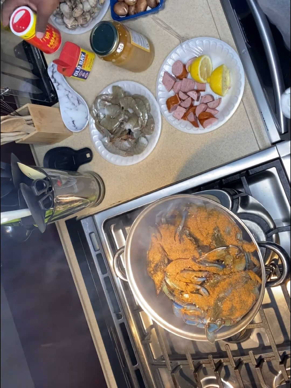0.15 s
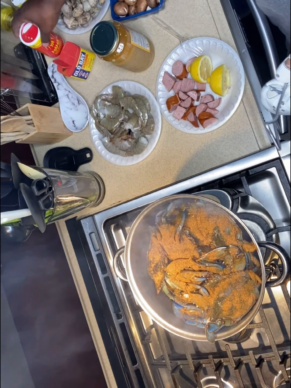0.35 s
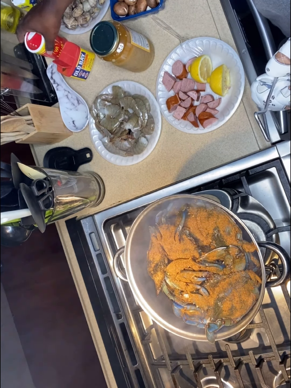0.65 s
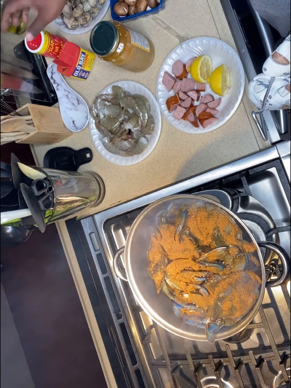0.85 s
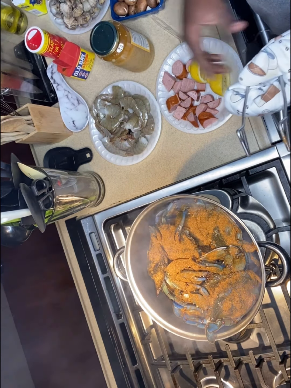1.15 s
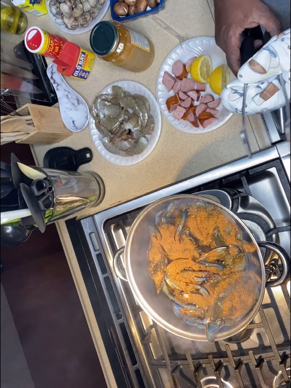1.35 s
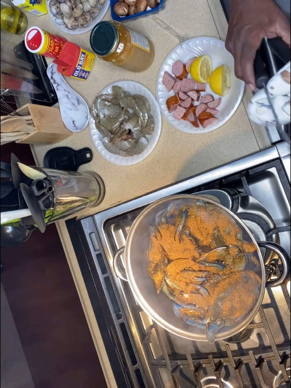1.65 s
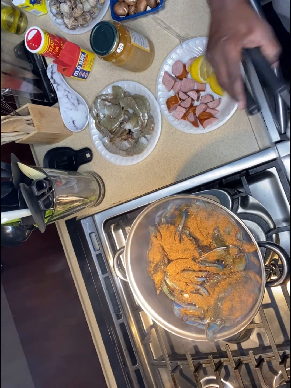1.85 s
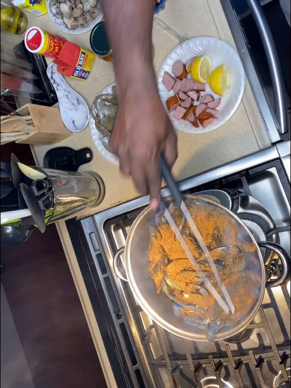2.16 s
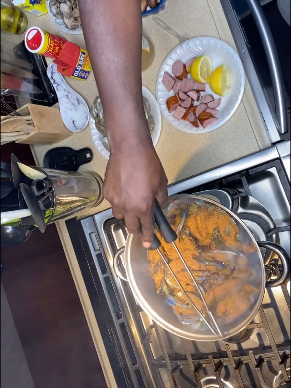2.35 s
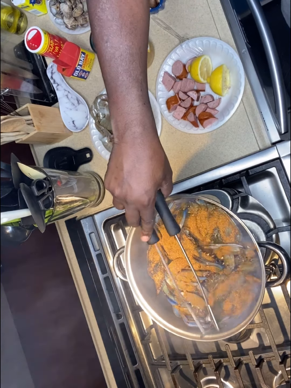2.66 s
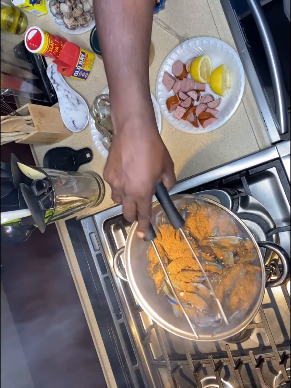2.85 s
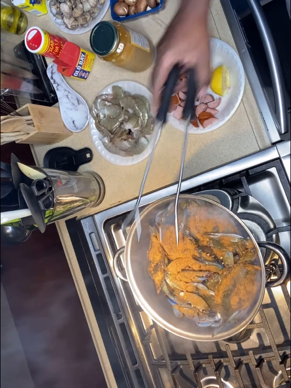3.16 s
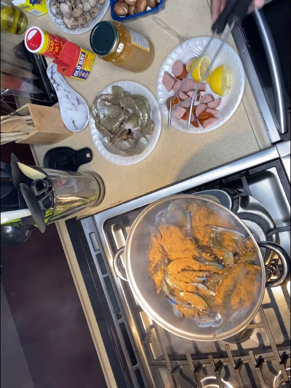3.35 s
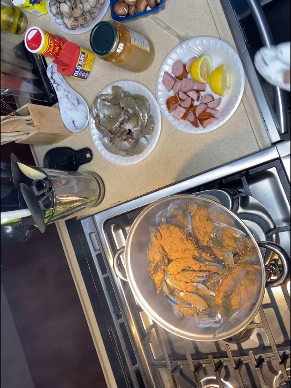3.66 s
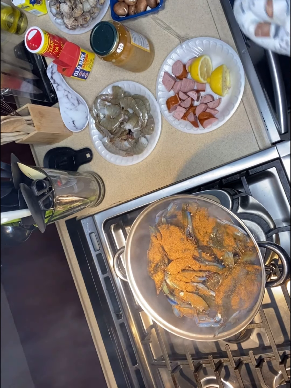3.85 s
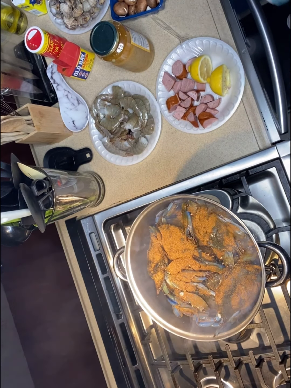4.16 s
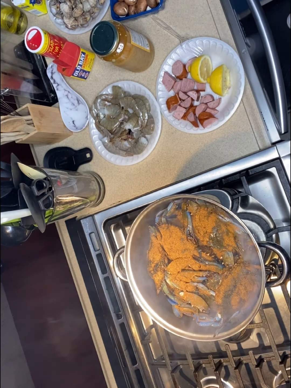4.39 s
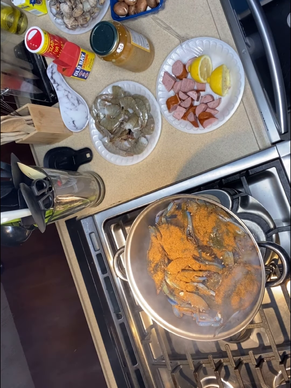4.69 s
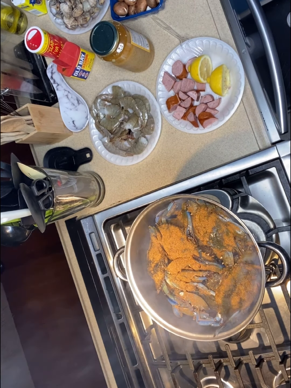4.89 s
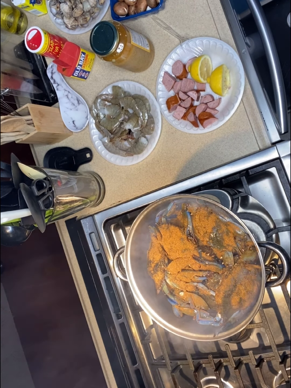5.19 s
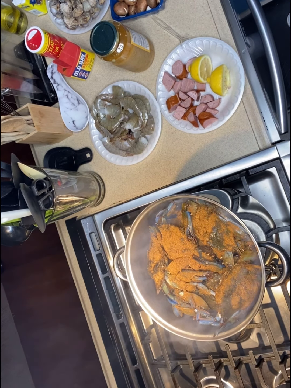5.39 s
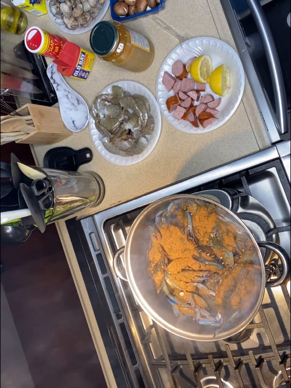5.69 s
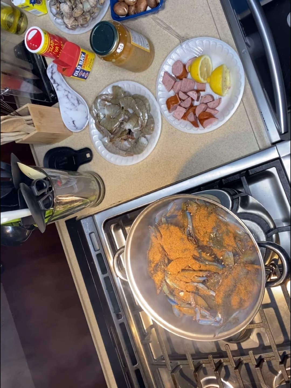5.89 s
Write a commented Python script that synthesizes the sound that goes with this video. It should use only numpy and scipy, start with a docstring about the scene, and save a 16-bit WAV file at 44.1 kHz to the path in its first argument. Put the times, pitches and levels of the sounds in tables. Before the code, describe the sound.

Close stereo pickup above a stove: faint steady roar, gas hiss and tiny bubbles. First rubbing and a tin's sharp rattling landing, then mitt and tool handling, a hard tong knock on the pot with a brief scrape and shell taps. Later, slightly farther away, dull wooden knocks, a ringing lid and something heavy sliding, ending in firm knocks.

```python
"""In a kitchen a pot of shellfish simmers on a gas stove: coloured noise for flame and hiss, tiny rings for bubbles.
A spice tin is put down on the counter, an oven mitt and tongs are handled, the tongs click and knock shells and pot.
Then a steel lid and dull knocks sound off to one side, and something heavy slides along a shelf.
Every blow is a crack and clatter plus the decaying modes of the struck thing; rubs are noise shaped by strokes.
The room adds a diffuse, decaying echo to the blows."""
import sys
import numpy as np
from scipy import signal
from scipy.fft import rfft, irfft, next_fast_len
from scipy.io import wavfile
from scipy.ndimage import uniform_filter1d

SR = 44100
rng = np.random.default_rng(int(sys.argv[2]) if len(sys.argv) > 2 else 0)


def wav_out(sig):
    """Save sig, one row per channel (or a flat mono array), as 16-bit PCM at SR to the path in sys.argv[1]."""
    wavfile.write(sys.argv[1], SR, np.round(np.clip(np.atleast_2d(sig).T, -1, 1) * 32767).astype(np.int16))


N = 265923

# Modes of a hollow board. Each row: frequency in Hz, level in dB, t60 when free in seconds.
BOARD_MODES = [(544, -4, .06), (632, -7, .05), (800, -5, .05), (942, -6, .05), (1138, -3, .05),
               (1330, -5, .05), (1650, -3, .04), (1835, -5, .04), (1940, -4, .04), (2080, -4, .04),
               (2155, -2, .05), (2430, -3, .04), (2820, -5, .04), (3200, -6, .03), (3450, -7, .03),
               (3709, -8, .03), (4000, -8, .03), (4260, -9, .03)]
# Spectrum of bright friction. Each row: frequency in Hz, density in dB per Hz.
RUSTLE_SPECTRUM = [(1500, -26), (2700, -5), (4200, -6), (6500, -11.5), (9000, -16), (11500, -20),
                   (13500, -52)]
# Coherence of diffuse sound at the two ports. Each row: frequency in Hz, left-right likeness from -1 to 1.
ROOM_LIKENESS = [(60, 0.99), (120, 0.98), (240, 0.89), (480, 0.3), (950, 0.35), (1890, 0.3), (3770, 0.3),
                 (7520, 0.6), (15000, -0.69)]


def from_db(db):
    """Decibels to amplitude: 20 dB is a factor of ten."""
    return 10 ** (np.asarray(db) / 20)


def rms_one(x):
    """Normalise the mean power to one."""
    return x / np.sqrt(np.mean(x ** 2) + 1e-20)


def at_hz(points, hz):
    """Interpolate a table along logarithmic frequency, the axis of musical intervals."""
    table_hz, values = np.transpose(points)
    return np.interp(np.log(np.maximum(hz, 1)), np.log(table_hz), values)


def drift(rate_hz):
    """Slow random wandering of rms 1: white noise through two equal low-pass poles."""
    step = 40   # samples between computed points
    r = np.exp(-2 * np.pi * rate_hz * step / SR)
    noise = rng.standard_normal(N // step + 2002)
    slow = signal.lfilter([1], [1, -2 * r, r * r], noise)[2000:]   # past the filter's start
    return np.interp(np.arange(N) / step, np.arange(len(slow)), rms_one(slow))


def stereo(mid, side, spectrum, likeness):
    """Partial coherence: the balance of unrelated mid and side sets the left-right likeness; rms 1."""
    size = next_fast_len(len(mid), real=True)
    hz = np.fft.rfftfreq(size, 1 / SR)
    alike = np.clip(at_hz(likeness, hz), -1, 1)
    common = np.sqrt(1 + alike) * rfft(mid, size)
    opposed = np.sqrt(1 - alike) * rfft(side, size)
    both = common + opposed * [[1], [-1]]
    coloured = both * from_db(at_hz(spectrum, hz))
    return rms_one(irfft(coloured, size)[:, :len(mid)])


def stove():
    """Turbulence: flame and simmering broth roar as broadband noise, under a hiss of gas and steam."""
    # Flame roar and simmer. Each row: frequency in Hz, density in dB per Hz.
    roar_spectrum = [(30, -17), (58, 5.5), (80, -10), (110, 0), (200, -12.5), (300, -2.5), (400, -14.5),
                     (860, -10.5), (1060, -13), (1600, -7), (2300, -12), (2800, -16.5), (3400, -13),
                     (3850, -17), (4300, -14.5), (5300, -26), (7000, -45)]
    # The roar dips late on. Each row: time in seconds, level change in dB.
    roar_level = [(0, 0), (2.5, 1), (3.9, .5), (4.9, -1), (5.12, -3.5), (5.35, -2), (6.0, -1)]
    # Gas and steam. Each row: frequency in Hz, density in dB per Hz.
    hiss_spectrum = [(3000, -30), (4300, -8), (5450, -7), (5850, 0.5), (6300, -0.7), (6550, -6), (6750, -3),
                     (7300, -11), (9000, -14), (9500, -12), (11800, -16), (13000, -40)]
    # The hiss is weaker late on. Each row: time in seconds, level in dB.
    hiss_level = [(2.3, -61.5), (3.3, -61), (3.9, -62), (4.4, -63), (5.1, -69), (6.0, -67)]
    # Each row: frequency in Hz, left-right likeness from -1 to 1.
    likeness = [(60, 0.97), (120, 0.92), (240, 0.85), (480, 0.4), (950, 0.63), (1890, 0.62), (3770, 0.55),
                (7520, 0.83), (15000, -0.64)]
    t = np.arange(N) / SR
    hiss_db = np.interp(t, *np.transpose(hiss_level)) + .6 * drift(4)   # wavers slightly
    hiss = from_db(hiss_db) * stereo(*rng.standard_normal((2, N)), hiss_spectrum, likeness)
    roar_db = -58.2 + np.interp(t, *np.transpose(roar_level))
    roar = from_db(roar_db) * stereo(*rng.standard_normal((2, N)), roar_spectrum, likeness)
    return roar + hiss


def simmer():
    """Bubble resonance: bursts at random and in clumps each ring briefly, the higher pitches the stronger."""
    typical_per_s, cycles_to_60_db, level_db = 200, 30, -67.5
    chance = typical_per_s * from_db(4 * drift(5)) / SR
    bursts = (rng.random((2, N)) < chance) * rng.standard_normal((2, N))
    shared = bursts + .7 * bursts[::-1]   # each side also hears the other's bubbles
    pitch_index, out = rng.integers(0, 14, N), 0
    for k, hz in enumerate(np.geomspace(1300, 1900, num=14)):
        r, w = from_db(-60 * hz / cycles_to_60_db / SR), 2 * np.pi * hz / SR
        own = shared * (pitch_index == k) + 1e-18   # the offset keeps the filter from underflow
        out = out + hz * signal.lfilter([0, np.sin(w)], [1, -2 * r * np.cos(w), r * r], own)
    return from_db(level_db) * rms_one(out)


def strokes(rows, hold_s, fade_db_per_s):
    """Incoherent addition: strokes (peak s, swell s, dB) swell, hold and fade, and their powers add."""
    swell_db = 20   # a swell climbs this far to its peak
    t, power = np.arange(0, N + 64, 64) / SR, 0
    for s, swell_s, level_db in rows:
        before_db = swell_db * (s - t) / swell_s
        after_db = fade_db_per_s * np.maximum(t - s - hold_s, 0)
        under_db = np.where(t < s, before_db, after_db)
        power = power + from_db(level_db - under_db) ** 2
    return np.interp(np.arange(N) / SR, t, np.sqrt(power))


def handling(grain_db):
    """Friction: cloth and tools slide in uneven grains of three colours under the same strokes."""
    # Hands, mitt and tools rubbing past things. Each row: peak time in seconds, swell in seconds,
    # level in dB, brightness in dB, weight in dB.
    rubs = [(.15, 0.42, -49.5, 0, -9), (.36, 0.3, -45.5, 1, -6), (.58, 0.22, -46.5, -1, -9),
            (0.748, 0.25, -47.5, 0.5, -11), (0.929, 0.087, -45.5, -1, -14), (1.099, 0.084, -41.5, -0.5, -9),
            (1.399, 0.053, -49.5, 4, -11), (1.559, 0.081, -48.5, -4.5, -7), (1.66, 0.1, -52.5, 1.5, -11),
            (1.77, 0.12, -49, -1, -13), (1.999, 0.11, -45.5, -1, -9), (2.42, .05, -52, -4, -12),
            (3.1, .1, -62, 3, -6), (3.55, 0.12, -61, -6, -2), (3.885, 0.025, -51.5, -5, -9),
            (4.155, 0.026, -62.5, 4.5, -4), (4.66, 0.084, -52, -6, -5), (5.02, 0.068, -52, -8, 2),
            (5.19, 0.088, -61, -7, 6.5), (5.38, .1, -62, -15, 7), (5.55, .1, -64, -8, 6),
            (5.88, 0.089, -51, -15, -9)]
    # Low friction. Each row: frequency in Hz, density in dB per Hz.
    rumble_spectrum = [(25, -18), (55, 10.5), (125, 10.5), (200, -0.5), (320, -0.5), (500, -86)]
    # Middle friction. Each row: frequency in Hz, density in dB per Hz.
    shuffle_spectrum = [(150, -16), (330, -2), (700, -4), (1600, -3), (2400, -5), (4000, -38)]
    pan_db = 1.2   # left over right
    s, swell_s, level_db, bright_db, weight_db = np.transpose(rubs)
    colours = [(rumble_spectrum, weight_db, 3), (shuffle_spectrum, 0, .7), (RUSTLE_SPECTRUM, bright_db, .7)]
    out = 0
    for spectrum, offset_db, lumps_db in colours:
        unevenness_db = grain_db * drift(200) + lumps_db * drift(12)
        grains = rng.standard_normal((2, N)) * from_db(unevenness_db)
        gain = strokes(zip(s, swell_s, level_db + offset_db), hold_s=.025, fade_db_per_s=70.5)
        out = out + gain * stereo(*grains, spectrum, ROOM_LIKENESS)
    return out * from_db([[pan_db / 2], [-pan_db / 2]])


def thumps(rise_s):
    """Damped oscillation: a heavy touch makes the furniture boom once, alike in both ports."""
    # Thumps through counter and floor. Each row: start in seconds, level in dB, frequency in Hz, t60 in seconds.
    thump_rows = [(0.339, -31, 61.7, 0.13), (0.419, -32, 128, 0.45), (1.08, -38.5, 111, 0.14),
                  (1.986, -30.5, 112, 0.087), (3.931, -35, 45.4, 0.29), (4.388, -37.5, 126, 0.21),
                  (4.81, -30.5, 109.6, 0.17), (5, -35, 175.5, 0.26), (5.718, -39, 107.5, 0.16)]
    out, t = np.zeros(N + SR), np.arange(SR // 2) / SR
    for s, level_db, hz, t60 in thump_rows:
        i = round(s * SR)
        envelope = from_db(level_db - 60 * t / t60) * (1 - np.exp(-t / rise_s))
        out[i:i + len(t)] += envelope * np.sin(2 * np.pi * hz * t)
    return out[:N]


def blows(table, modes, colour_db, clatter_db, pan_db, freedom, favour_db, rise_s):
    """Modal impact: struck modes ring over a dying clatter of small contacts, six bands set to their peaks."""
    # Edges of the six bands, in Hz.
    edges_hz = [160, 600, 1400, 2800, 4800, 7500, 15000]
    # Share of the pan in each band: bass and top arrive nearly alike in both ports.
    pan_share = [.3, .6, 1.3, .8, .6, .1]
    pivot_hz = 2000   # weight tilts a blow's colour below this, hardness above
    lows_late = .6   # doublings of the rise time per octave down
    favour_width, favour_rings = .015, .1   # relative width of a favoured spot; its extra share of ring
    pair_split, pair_db = .018, -1   # each mode beats with a close twin: relative spread, level
    crack_s, crack_db = .0008, 1   # the first contact snaps above the clatter
    grit_db, spread_db = 2.5, 1.5   # uneven clatter; no two blows strike a mode equally

    out, t = np.zeros((2, N + SR)), np.arange(11000) / SR
    bank = [signal.butter(2, pair, "band", fs=SR, output="sos") for pair in zip(edges_hz, edges_hz[1:])]
    octaves = np.log2(np.sqrt(np.multiply(edges_hz[:-1], edges_hz[1:])) / pivot_hz)
    hz, level_db, t60 = np.transpose(modes)[:, :, None]
    for s, peak_db, weight, hardness, clatter_s, *favoured_hz in table:
        tilt_db = np.where(octaves < 0, -weight, hardness) * octaves
        peaks_db = peak_db + np.array(colour_db) + tilt_db

        favour = sum(np.exp(-(np.log(hz / f) / favour_width) ** 2) for f in favoured_hz)
        uneven_db = spread_db * rng.standard_normal((len(modes), 1))
        strength = from_db(level_db + favour_db * favour + uneven_db)
        phase = 2 * np.pi * rng.random((len(modes), 1))
        twin_hz = hz * (1 + pair_split * rng.standard_normal((len(modes), 1)))
        twin = from_db(pair_db) * np.sin(2 * np.pi * twin_hz * t + phase)
        pair = np.sin(2 * np.pi * hz * t + phase) + twin
        decay = from_db(-60 * t / (t60 * freedom * (1 + favour_rings * favour)))
        rings = np.sum(strength * pair * decay, axis=0)

        grit = from_db(grit_db * np.repeat(rng.standard_normal(len(t) // 50), 50))
        dying = np.exp(-t / clatter_s) + from_db(crack_db) * np.exp(-t / crack_s)
        clatter = rng.standard_normal(len(t)) * grit * dying

        struck = rings + from_db(clatter_db) * clatter
        parts = []
        for sos, octave in zip(bank, octaves):
            band_rise_s = rise_s * 2 ** (-lows_late * octave)
            parts.append(signal.sosfilt(sos, struck) * (1 - np.exp(-t / band_rise_s)))
        peaks = [np.sqrt(uniform_filter1d(2 * p[:1024] ** 2, size=200).max()) for p in parts]
        gains = from_db(peaks_db + np.outer([pan_db / 2, -pan_db / 2], pan_share)) / peaks
        signs = (-1) ** np.arange(len(bank))   # alternate signs join the bands without notches
        i = round(s * SR)
        out[:, i:i + len(t)] += (gains * signs) @ parts
    return out[:, :N]


def tin():
    """Plate modes: a spice tin lands on the counter in a quick run of contacts."""
    # Each row: start in seconds, peak at the pivot in dB, weight and hardness in dB per octave,
    # clatter in seconds, then any modes that the spot favours in Hz.
    rows = [(.393, -25, 0, -6, 0.008, 2040), (.398, -30, 0, -4, .005, 2040, 3750),
            (.404, -17, -1.5, 1.5, .004, 3250), (.42, -25.5, 3.5, -3, 0.0093, 2040),
            (.429, -28, 2, 1, 0.0069), (.435, -32, -2, 1, .003, 3750), (.441, -26.5, 0, 1, 0.005, 3400),
            (.451, -28.5, 2, -4, 0.011, 2040), (.458, -35, 0, 0, .004, 3750),
            (.466, -38, 0, -1, .005, 3250), (.478, -37, 0, -1, .005, 4880)]
    # Each row: frequency in Hz, level in dB, t60 when free in seconds.
    modes = [(260, -6, .1), (370, -2, .1), (454, -5, .08), (700, -12, .05), (1023, -9, .08),
             (1300, -11, .05), (1890, -7, .08), (1970, -8, .08), (2040, -1.5, .09), (2370, -9, .05),
             (2820, -11, .06), (3075, -8, .05), (3250, -6, .07), (3400, -10, .1), (3750, -7, .07),
             (4880, -10, .1), (6100, -12, .05), (9200, -10, .03), (9900, -14, .03)]
    # Colour of a plain blow in the six bands, in dB against the pivot.
    colour_db = [-5.5, -4, -0.5, 0, -5.5, -4.5]
    return blows(rows, modes, colour_db, clatter_db=5, pan_db=3.5, freedom=.55, favour_db=2, rise_s=.0006)


def tongs_and_pot():
    """Damped modes: the tongs' spring clicks once, then the tongs knock the pot wall, which rings briefly."""
    # The first row is the spring's click. Each row: start in seconds, peak at the pivot in dB,
    # weight and hardness in dB per octave, clatter in seconds, then any favoured modes in Hz.
    rows = [(2.029, -43.5, -4, 11, 0.0053, 7090), (2.249, -17, -1, -0.5, 0.004, 1787),
            (2.254, -21, 2, 1, .003, 1787, 830), (2.262, -25, 0, -4, .004, 1702),
            (2.266, -36, -2, 4, .003, 2527), (2.275, -25, 1, -4, 0.004, 2527, 714),
            (2.289, -31, 0, -2, .005, 2374), (2.304, -37, 3, -1, .006, 830),
            (2.297, -36, -2, 2, .004, 2374), (2.312, -41, -2, 4, .004, 3800),
            (2.357, -45, -1, 4, .004, 3800), (2.322, -36, -2, -4, .005, 2527),
            (2.369, -39, 3, -1, .003, 1270), (2.378, -42, 5, 1.5, .004, 960),
            (2.386, -48, -2, 5, .004, 3800), (2.402, -46, 1, 3, .004, 960, 3800),
            (2.415, -46, 4, -3, .006, 960)]
    # Each row: frequency in Hz, level in dB, t60 when free in seconds.
    modes = [(288, -9, .12), (714, -7, .08), (830, -10, .05), (960, -9, .08), (1270, -9, .06),
             (1529, -10, .08), (1635, -9, .06), (1702, -9, .06), (1787, -1, .07), (2036, -4, .07),
             (2374, -10, .08), (2527, -3, .08), (3122, -13, .07), (3800, -11, .04), (4700, -11, .04),
             (7090, -20, .05)]
    # Colour of a plain blow in the six bands, in dB against the pivot.
    colour_db = [-11.5, -5, 1.5, -5.5, -3, -11.5]
    return blows(rows, modes, colour_db, clatter_db=4.5, pan_db=1, freedom=.42, favour_db=4, rise_s=.001)


def shells():
    """Damped resonance: small hard shells, knocked by the tongs, ring very briefly."""
    # Each row: start in seconds, peak at the pivot in dB, weight and hardness in dB per octave,
    # clatter in seconds, then any modes that the spot favours in Hz.
    rows = [(2.229, -40, -4.5, 4, 0.016), (2.332, -48, 2, -3, .003, 900),
            (2.34, -35, 1.5, 4, 0.002, 900, 3500), (2.39, -42, 3, 6, 0.0018),
            (2.393, -55, 12.5, 3, .002, 290), (2.435, -65, 11, 0.5, .004, 290),
            (2.463, -44, -0.5, 0, .003, 900), (2.5, -53, 0, 2, .004), (2.636, -50, 1, -4, .005, 900),
            (2.657, -30, -0.5, 0.5, 0.0022), (2.666, -41, -0.5, 4, 0.0044),
            (3.335, -56.5, 6, 8, 0.002, 700, 900), (3.343, -74, 11, 0, .004, 290),
            (3.416, -66.5, 5, 10, 0.0038)]
    # Each row: frequency in Hz, level in dB, t60 when free in seconds.
    modes = [(290, -8, .1), (700, -14, .03), (900, -6, .03), (1100, 0, .04), (1276, 0, .04),
             (1390, -3, .04), (1700, -8, .02), (3500, -10, .02)]
    # Colour of a plain blow in the six bands, in dB against the pivot.
    colour_db = [-8, 9, -2.5, -6.5, -14, -16]
    return blows(rows, modes, colour_db, clatter_db=5.5, pan_db=.7, freedom=.4, favour_db=7, rise_s=.0008)


def scrape(grain_db):
    """Hard friction: steel tips drag over shells as bright grit and stop abruptly."""
    # Drags of the tongs. Each row: peak time in seconds, swell in seconds, level in dB.
    drags = [(2.39, .12, -42)]
    grit = rng.standard_normal((2, N)) * from_db(grain_db * drift(150))
    gain = strokes(drags, hold_s=.02, fade_db_per_s=500)
    return gain * stereo(*grit, RUSTLE_SPECTRUM, ROOM_LIKENESS)


def knocks():
    """Board modes: dull knocks excite a hollow board's close, short resonances, which also colour a few faint
    short sounds."""
    # The row at 4.15 s is barely audible. Each row: start in seconds, peak at the pivot in dB, # weight and
    # hardness in dB per octave, clatter in seconds, then any favoured modes in Hz.
    rows = [(3.915, -33, -3, 4, 0.006, 4260), (3.922, -24.5, -1, 3, .008, 2430),
            (3.929, -32, 1, 3, .006, 2430, 1138), (3.942, -37, 3, 2, .007, 2155, 942),
            (3.953, -37, 1, 0, .006, 1940), (4.009, -57, 8, 16, 0.0095), (4.15, -59, 3.5, 4, .012),
            (4.552, -28.5, 0.5, 4, .005, 3200), (4.807, -30, 0, -6, 0.006, 2155),
            (4.812, -29, 0, -4, .006, 2430), (4.818, -32, 1, -4, .005, 1940),
            (4.826, -30.5, 1, -2, .006, 1650), (4.833, -35, 0, -2, .005, 2820),
            (4.84, -33, 3, -4, .006, 544), (4.848, -34, 2, -2, .005, 1138),
            (4.856, -31, 0, -1, .006, 1940, 3200), (4.864, -38, 1, -3, .005, 2080),
            (5.008, -52, 9, -8, 0.017), (5.348, -34, -0.5, -7, 0.014, 2155), (5.443, -40, 2, -16, 0.0093),
            (5.568, -31.5, 0.5, -3, 0.013), (5.596, -40, 2, -3, .008, 1138),
            (5.696, -22, -2, 3, 0.007, 2155, 4260), (5.709, -20.5, 0, 3, 0.006, 1138, 4000),
            (5.716, -29, 0, 2, .005, 2080, 3450), (5.722, -33, 3, 2, .006, 544),
            (5.745, -34, 2, 0, .006, 544, 2820), (5.776, -40, 2, 2, .006, 800),
            (5.797, -42, 3, -8, .003, 1138), (5.944, -25, 0.5, 0, 0.005, 2430),
            (5.958, -35, 3, 2, .006, 544), (5.978, -34, 1, 0, .006, 1940), (6.002, -37, 3, 0, .006, 1650)]
    # Colour of a plain blow in the six bands, in dB against the pivot.
    colour_db = [-11, -6.5, 0, -4.5, -26, -26]
    return blows(rows, BOARD_MODES, colour_db, clatter_db=6, pan_db=4, freedom=.45, favour_db=5, rise_s=.001)


def lid():
    """Plate modes: a steel lid rings in many bright modes when struck."""
    # Each row: start in seconds, peak at the pivot in dB, weight and hardness in dB per octave,
    # clatter in seconds, then any modes that the spot favours in Hz.
    rows = [(4.388, -28.5, 0, 2.85, 0.0053, 4080, 6150, 7446),
            (4.71, -31.5, 2.6, 0, 0.011, 4080, 5030, 6730),
            (4.873, -34, 2.7, 0, 0.006, 3060, 3365, 3440, 5210), (4.393, -37, 0, 2, .004, 5740),
            (4.408, -43, 0, 3, .003, 6730), (4.424, -46, 0, 2, .004, 5030),
            (4.718, -40, 0, 0, .006, 3730, 6730), (4.731, -43, 0, -1, .005, 3440),
            (4.885, -45, 0, 0, .004, 3302)]
    # Each row: frequency in Hz, level in dB, t60 when free in seconds.
    modes = [(544, -12, .05), (790, -12, .06), (953, -11, .08), (1500, -14, .06), (1973, -12, .12),
             (2557, -14, .1), (3060, -10, .07), (3302, -9, .08), (3365, -15, .35), (3440, -11, .16),
             (3730, -8, .07), (3930, -13, .15), (4080, -5, .14), (4200, -8, .13), (5030, -8, .14),
             (5210, -8, .15), (5400, -12, .12), (5740, -11, .06), (6150, -5, .12), (6370, -13, .15),
             (6730, -8, .07), (7446, -6, .06), (8730, -13, .06), (10440, -14, .06)]
    # Colour of a plain blow in the six bands, in dB against the pivot.
    colour_db = [-5, -1.5, 1, 11.5, 7.5, 5]
    return blows(rows, modes, colour_db, clatter_db=7, pan_db=2.5, freedom=.36, favour_db=4.5, rise_s=.0012)


def slide(grain_db):
    """Friction-driven resonance: gritty sliding excites the modes of a hollow board."""
    # Something heavy slid along a shelf. Each row: peak time in seconds, swell in seconds, level in dB.
    slides = [(5.17, .06, -54), (5.21, .07, -51), (5.25, .07, -51), (5.285, 0.08, -51), (5.93, 0.26, -46)]
    # Each row: frequency in Hz, density in dB per Hz.
    spectrum = [(250, -50), (400, -24), (800, -6), (1130, 0), (1300, -2), (1500, -9), (2200, -12),
                (3000, -26), (4500, -60)]
    mode_width_hz, ring_db = 40, 8
    grit = rng.standard_normal((2, N)) * from_db(grain_db * drift(80))
    r, rung = np.exp(-np.pi * mode_width_hz / SR), 0
    for hz, level_db, _ in BOARD_MODES:
        poles = [1, -2 * r * np.cos(2 * np.pi * hz / SR), r * r]
        zeros = [(1 - r * r) / 2, 0, (r * r - 1) / 2]
        rung = rung + from_db(level_db) * signal.lfilter(zeros, poles, grit)
    friction = stereo(*(grit + from_db(ring_db) * rung), spectrum, ROOM_LIKENESS)
    return strokes(slides, hold_s=0, fade_db_per_s=250) * friction


def kitchen(x, onset_s):
    """Diffuse reverberation: half-octave bands of noise, each dying at its own rate after a gradual onset."""
    # Each row: frequency in Hz, t60 in seconds.
    room_t60 = [(100, .45), (260, .4), (700, .38), (1840, .33), (4850, .29), (12000, .2)]
    # Each row: frequency in Hz, level in dB.
    colour = [(100, -0.5), (350, 7.5), (900, 6.5), (2500, 9), (6000, 5), (11500, 4), (15000, -8)]
    # Bumps of the echo's spectrum between these two widths in Hz are evened out.
    even_hz = (80, 900)
    t, edges = np.arange(int(.7 * SR)) / SR, 60 * 2 ** np.arange(0, 8.2, .5)
    noise = stereo(*rng.standard_normal((2, len(t))), colour, ROOM_LIKENESS)
    tail = 0
    for low, high in zip(edges, edges[1:]):
        band = signal.sosfilt(signal.butter(1, [low, high], "band", fs=SR, output="sos"), noise)
        tail = tail + band * from_db(-60 * t / at_hz(room_t60, np.sqrt(low * high)))
    spectrum = rfft(tail)
    fine, coarse = [uniform_filter1d(np.abs(spectrum) ** 2, size=round(hz * len(t) / SR), axis=1) + 1e-12
                    for hz in even_hz]
    tail = irfft(spectrum * np.sqrt(coarse / fine), len(t)) * (t < .6)
    tail = tail * (1 - np.exp(-(t / onset_s) ** 2))
    unit_tail = tail / np.sqrt(np.mean(np.sum(tail ** 2, axis=1)))   # unit energy
    return signal.fftconvolve(x, unit_tail, axes=1)[:, :N]


def ports(x):
    """Interaural phase: direct sound reaches the two microphone ports out of step in the treble."""
    # Each row: frequency in Hz, lead of the left port in radians.
    port_phase = [(700, 0), (2200, -.9), (4300, -1.0), (6000, -.3), (8500, -.8), (11000, -2.4),
                  (13000, -3.1)]
    size = next_fast_len(N, real=True)
    turn = np.exp(1j * at_hz(port_phase, np.fft.rfftfreq(size, 1 / SR)))
    return np.array([irfft(rfft(x[0], size) * turn, size)[:N], x[1]])


def scene():
    """Superposition: direct blows, their echo, handling noise and the stove add."""
    tin_hits, pot_hits, shell_hits, lid_hits, board_hits = tin(), tongs_and_pot(), shells(), lid(), knocks()
    near = from_db(-9) * (tin_hits + pot_hits) + from_db(-8.5) * shell_hits
    far = from_db(-4.5) * (lid_hits + board_hits)   # farther is wetter
    room = kitchen(near + far, onset_s=.0027)
    direct = ports(tin_hits + pot_hits + shell_hits + lid_hits + board_hits) + thumps(rise_s=.013)
    friction = handling(grain_db=.7) + slide(grain_db=2) + scrape(grain_db=3)
    return direct + room + friction + stove() + simmer()


def record(dry):
    """Band limiting: deep bass is removed, and the treble falls steeply above about 12 kHz."""
    x = signal.sosfilt(signal.butter(2, 45, "high", fs=SR, output="sos"), dry)
    x = signal.sosfilt(signal.butter(6, 12500, fs=SR, output="sos"), x)
    return signal.sosfilt(signal.cheby2(12, 70, 16300, fs=SR, output="sos"), x)


dry = scene()
out = record(dry)
wav_out(out)
```